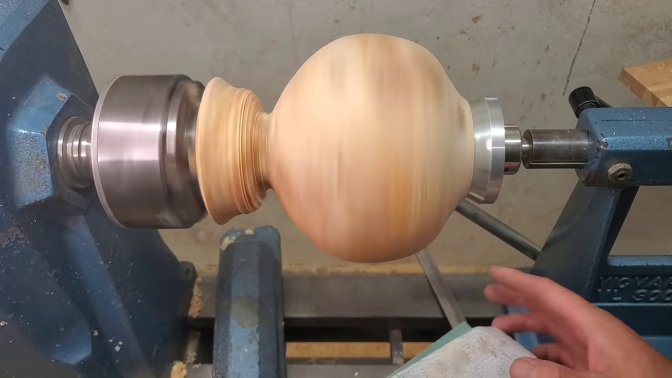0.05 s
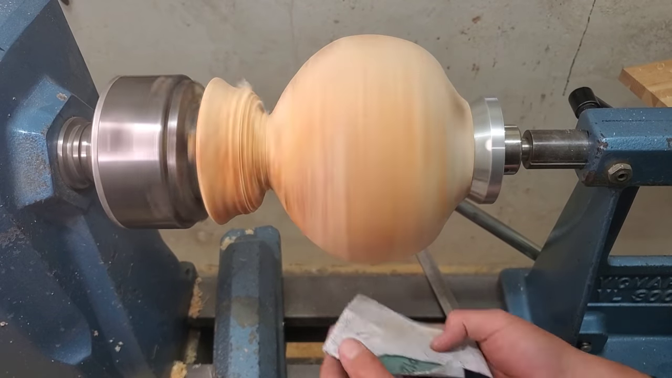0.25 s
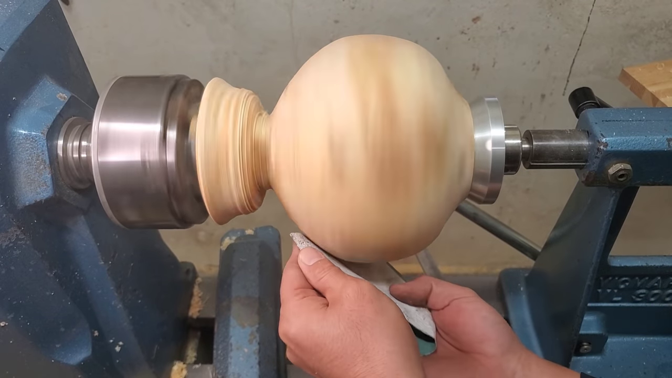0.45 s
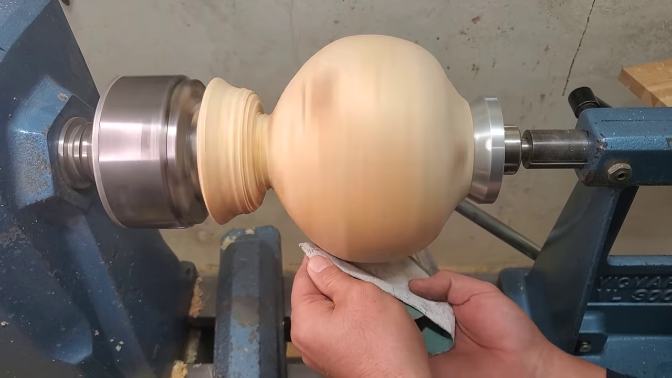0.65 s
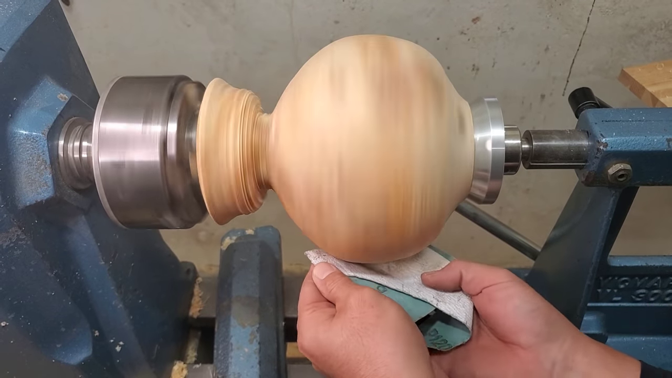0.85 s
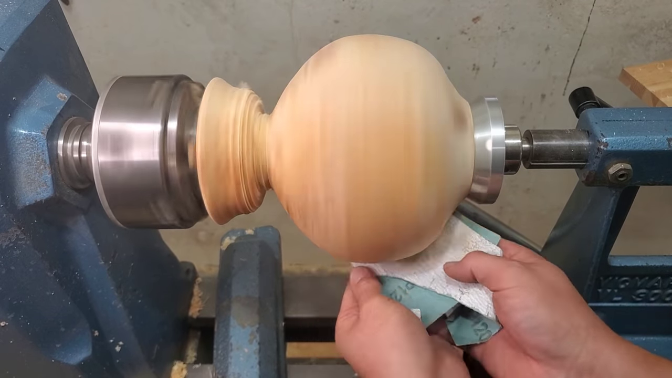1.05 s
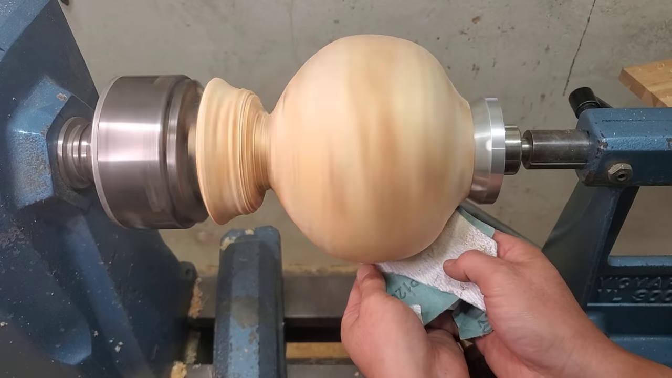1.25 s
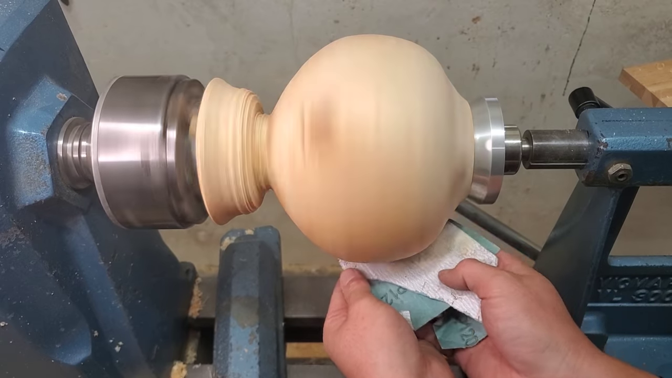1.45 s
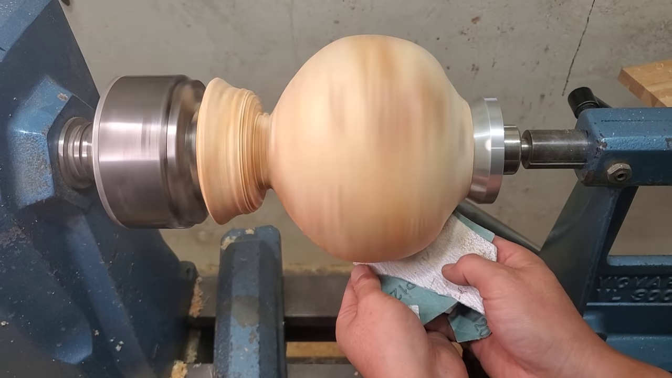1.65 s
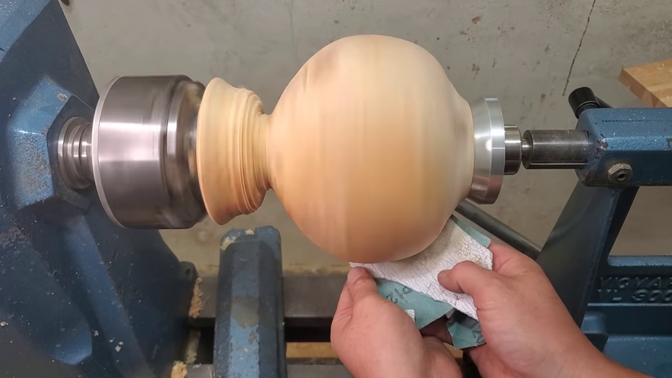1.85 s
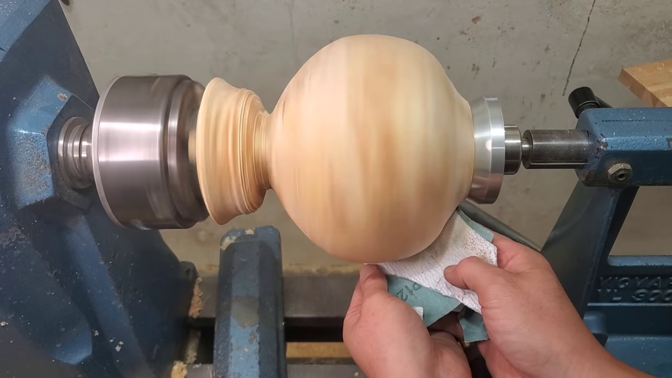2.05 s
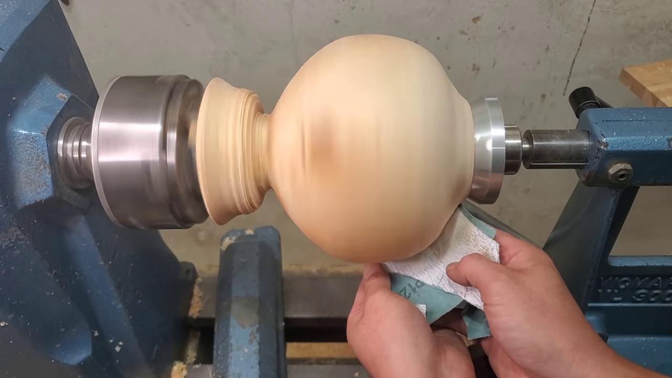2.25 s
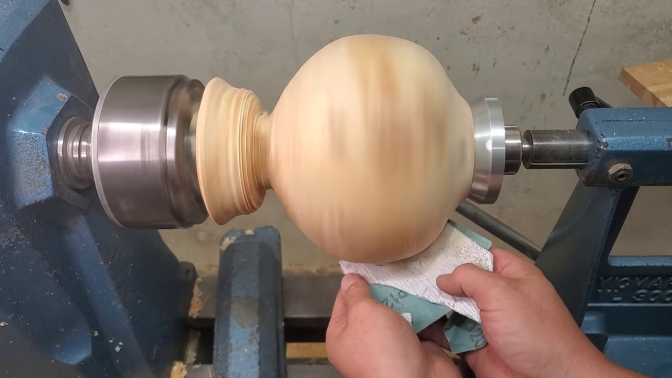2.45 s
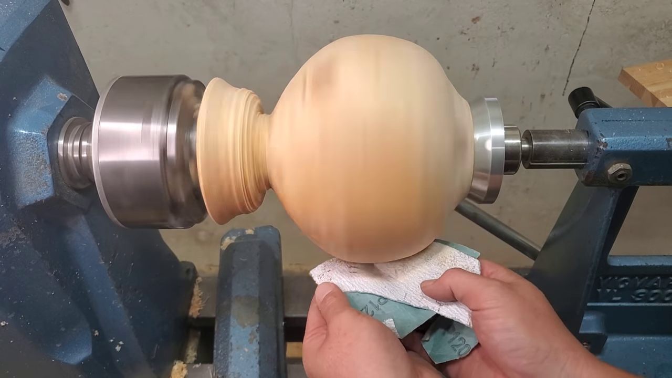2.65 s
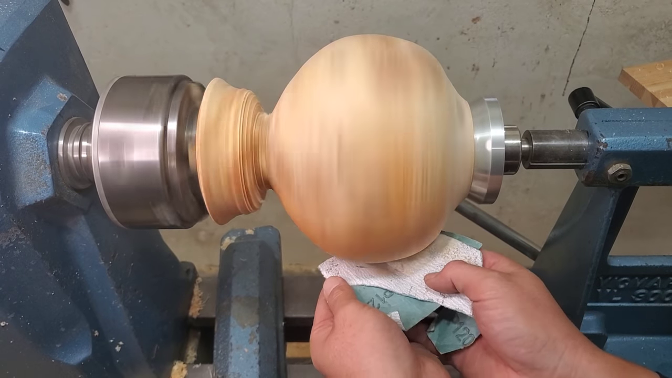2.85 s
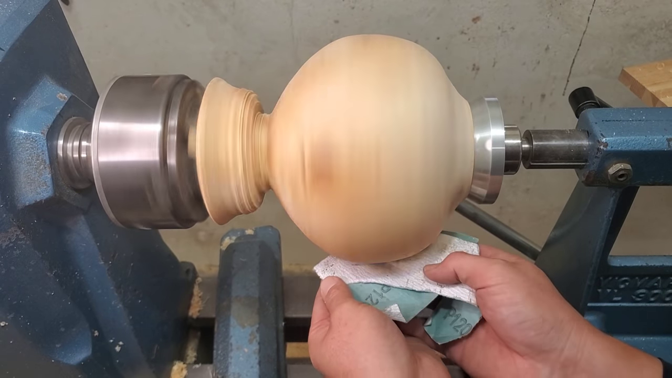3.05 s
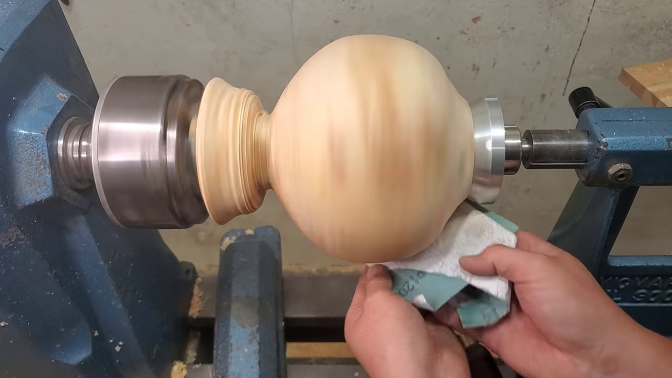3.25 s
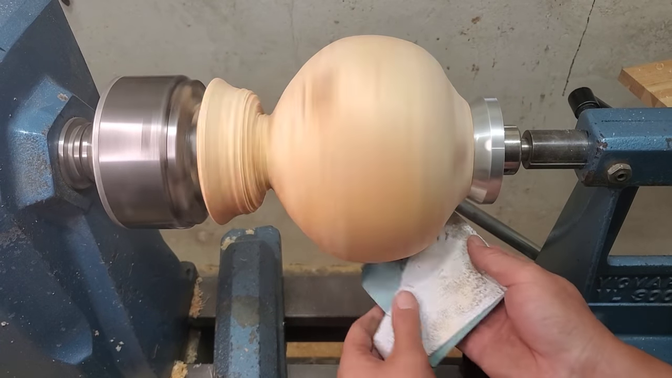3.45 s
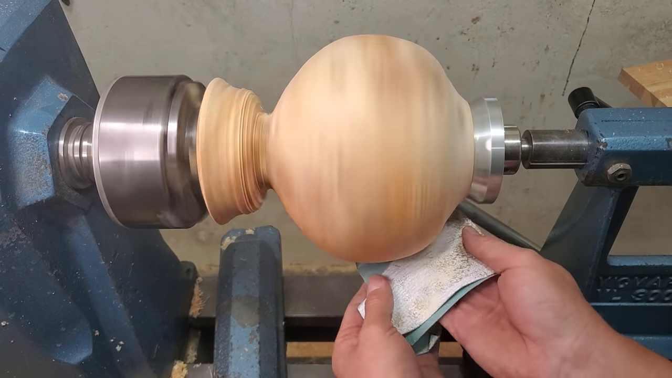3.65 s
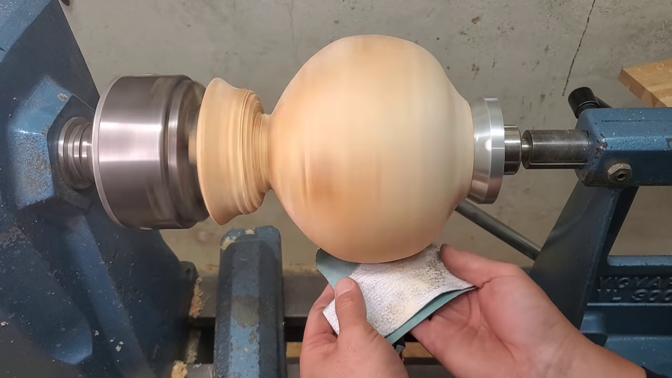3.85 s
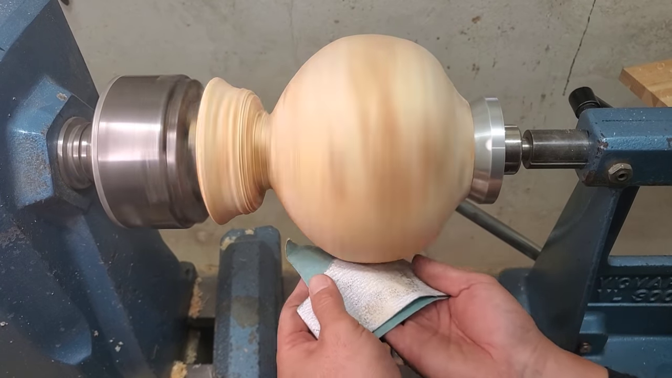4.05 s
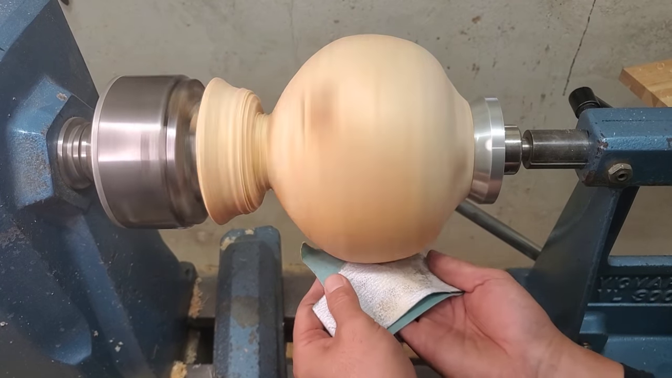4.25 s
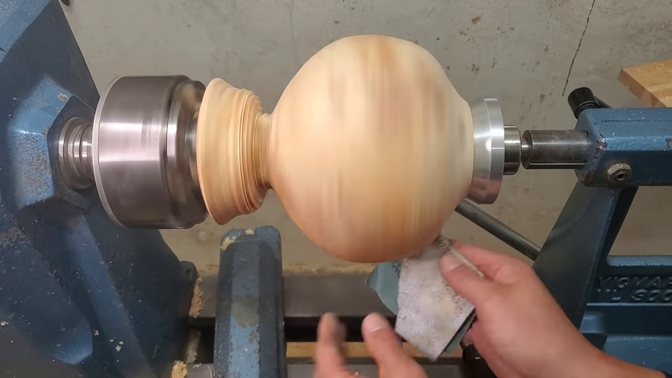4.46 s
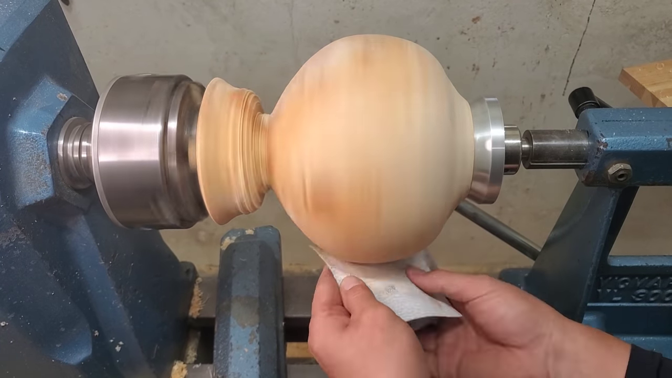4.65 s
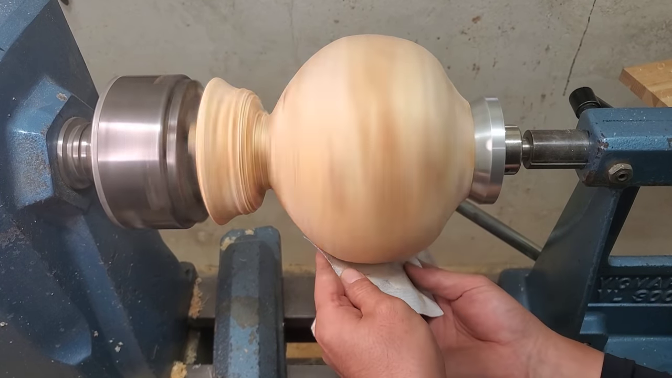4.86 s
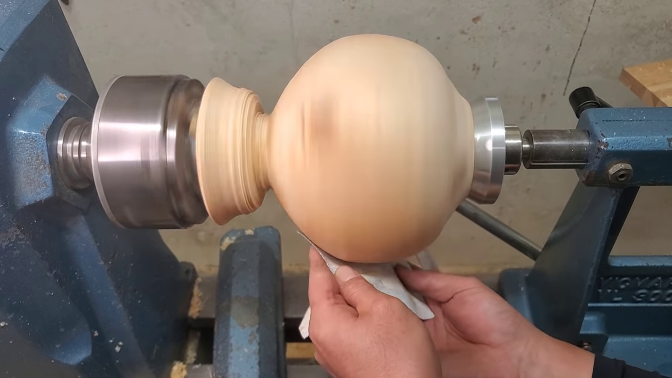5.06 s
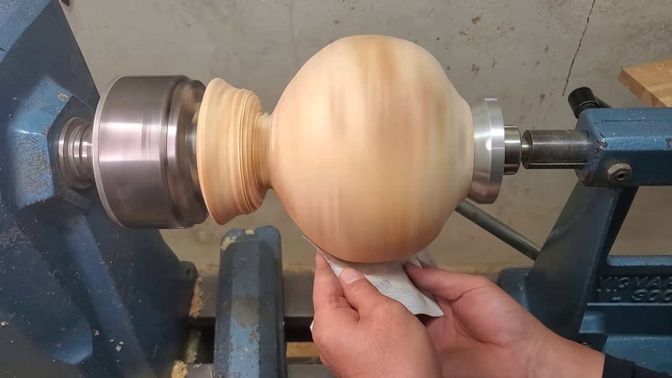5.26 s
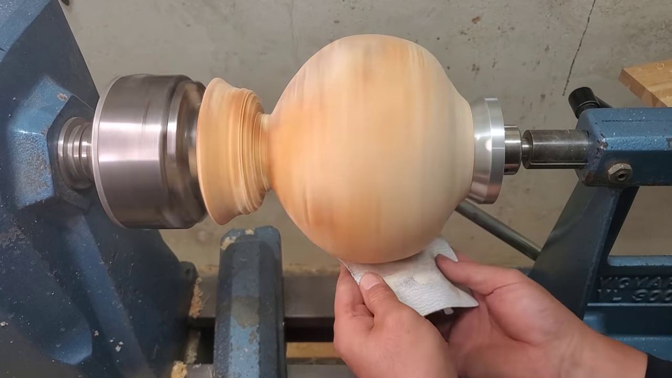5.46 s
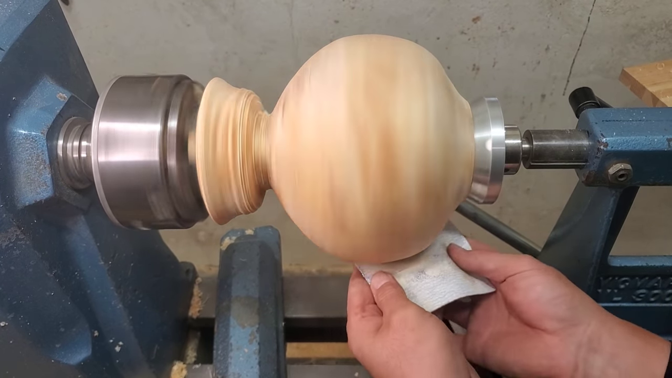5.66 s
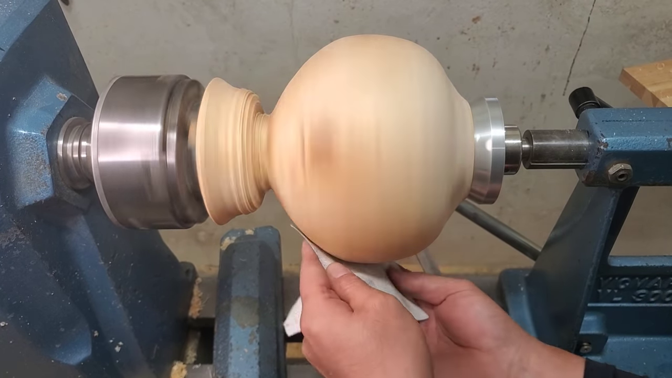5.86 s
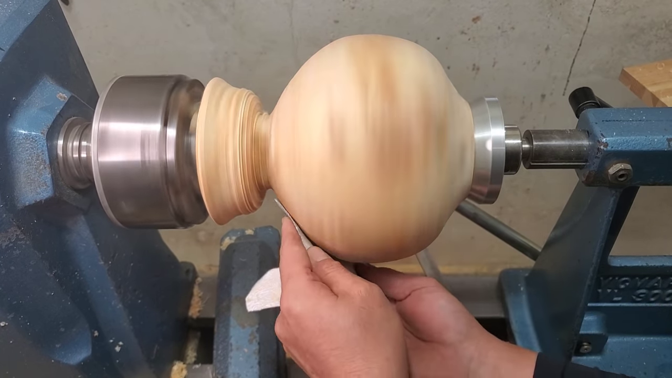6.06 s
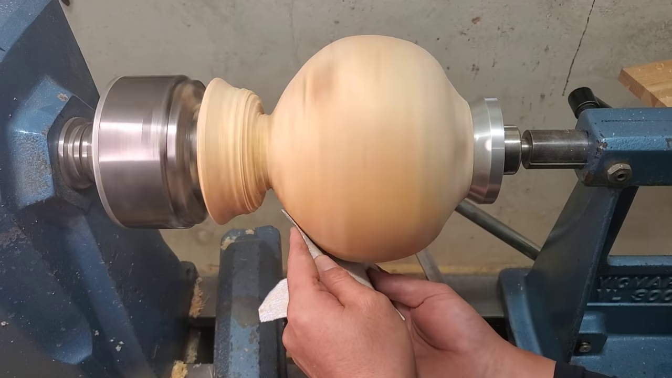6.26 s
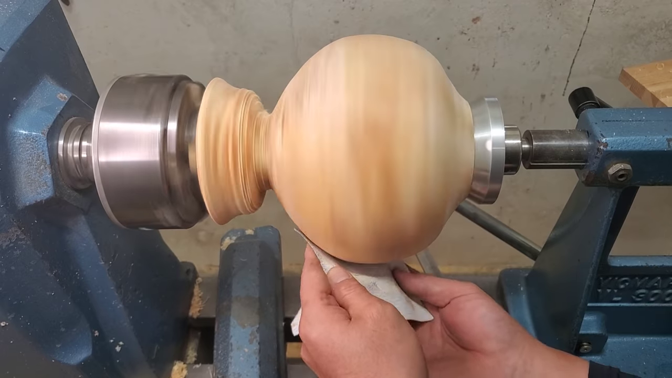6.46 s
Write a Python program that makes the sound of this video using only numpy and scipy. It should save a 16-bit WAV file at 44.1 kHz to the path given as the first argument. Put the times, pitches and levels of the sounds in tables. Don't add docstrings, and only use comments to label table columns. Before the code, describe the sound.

In a workshop, a lathe motor hums low with a faint whine. Paper crackles and soft hand knocks come first, then sandpaper presses on a spinning wooden ball, making a loud, bright, gritty hiss that throbs rapidly with each turn. It drops out briefly twice and continues to the end. Close stereo microphone, short room reverberation.

```python
import sys
import numpy as np
from scipy import signal
from scipy.io import wavfile
from scipy.ndimage import uniform_filter1d

SR = 44100
rng = np.random.default_rng(int(sys.argv[2]) if len(sys.argv) > 2 else 0)


def file_out(sig):
    cols = np.atleast_2d(sig).T
    lim = np.clip(cols, -1, 1)
    pcm = np.round(lim * 32767).astype(np.int16)
    wavfile.write(sys.argv[1], SR, pcm)


def gain_from_decibels(decibels):
    exponent = np.asarray(decibels, float) / 20
    return 10 ** exponent


N = 287091
HOP = 128

# time in seconds, cupping from 0 to 1, bite into the wood in dB,
# wobble once a turn in dB, place of the high spot in turns.
HANDS = [(.55, 0.09, -1.5, 1, .69), (.75, 0.17, 0.5, 1, .45), (.95, .3, -3, 2.5, 0.23),
         (1.33, 0.91, 3.5, 2, 0.36), (1.6, 0.25, 1, 4, 0.22), (1.75, 0.95, 6, 2.5, 0.26),
         (2.3, 0.68, 3.5, 1.5, 0.37), (2.8, .9, 6, 1.2, 0.39), (3.15, 0.56, 2, 3, .24),
         (3.35, .6, 0.5, 0.5, 0.47), (3.8, 0.77, -2, 2.1, 0.75), (4.05, .55, 1, 1.4, 0.36),
         (4.3, 0.35, -3, 3.5, 0.35), (4.87, 0, 4.5, 1.1, -0.14), (5.35, 0.4, 5.5, 0, -.07),
         (5.75, 0.59, -1, 1.8, 0.17), (6.02, 0.39, 6.5, 1, 0.041), (6.45, 0.38, 6.5, -0.5, 0.12)]
# time in seconds, lateness of the left port in microseconds.
PORT_DELAY = [(.7, 12), (1.3, 143), (2.2, 144), (3, 61), (3.65, 147), (4.2, 73), (4.85, 21), (5.75, 104),
              (6.2, 8.2)]
# time in seconds, gain in dB.
GAIN = [(.45, 0), (.52, -6.3), (.87, -6), (1.3, -10.5), (1.81, -8), (3.6, -6.5), (4.35, -7), (5.73, -7),
        (6.04, -9), (6.5, -5)]


def evened(x):
    return x / np.sqrt(np.mean(abs(x) ** 2) + 1e-20)


def read(points, hz):
    f, value = np.transpose(points)
    return np.interp(np.log(hz + 1), np.log(f + 1), value)


def columns(rows, t):
    s, *rest = np.transpose(rows)
    return [np.interp(t, s, c) for c in rest]


def drift(t, rate, count):
    f = np.geomspace(rate / 8, rate, 12)[:, None]
    start = rng.random((count, 12, 1))
    waves = np.sin(2 * np.pi * (f * t + start)) / np.sqrt(f)
    return evened(waves.sum(1))


def sanding():
    # frequency in Hz, level in dB per Hz.
    grit = [(410, -40), (700, -23.5), (1100, -18), (1740, -11.5), (2400, -8.5), (3000, -4.5), (4260, -2.5),
            (5890, -2.5), (8500, -2.5), (12000, -1), (15500, 1)]
    # frequency in Hz, share of the throb.
    throb_share = [(1500, 0.56), (4000, 0.2), (7000, 0.49), (12000, 0.91)]
    # frequency in Hz, left-right likeness.
    likeness = [(800, 0.42), (1500, 0.56), (4500, 0.38), (6500, 0.13), (9000, 0.12), (15000, 0.13)]
    # frequency in Hz, left minus right in dB.
    balance = [(60, 0.5), (180, -1.5), (550, 2.5), (1650, -4), (4970, -4), (15000, -4)]
    # start in seconds, end in seconds,
    # frequency in Hz, width in Hz, level in dB.
    grip_rings = [
        (1.18, 1.46, 5930, 1000, 4),
        (1.7, 2.1, 2040, 200, 4.5),
        (1.9, 2.6, 6040, 800, 2),
        (3.8, 4.1, 9900, 1500, 3),
        (4.85, 5.2, 1410, 150, 2.5),
        (5.1, 5.448, 1980, 150, 8.5),
        (5.95, 6.4, 1990, 150, 2.5),
        (2.398, 3.1, 3870, 500, 1),
    ]
    hz, t, (a, b) = signal.stft(grains(per_s=16000, spread_db=-0.1), SR, nperseg=4 * HOP, noverlap=3 * HOP)
    colour_db = read(grit, hz)[:, None] + grip(hz, t)
    colour_db += np.outer(read(throb_share, hz), throb(t))
    colour_db += rings(grip_rings, hz, t)

    same = np.clip(read(likeness, hz), 0, 1)[:, None]
    late = np.exp(-2j * np.pi * np.outer(hz, columns(PORT_DELAY, t)[0]) * 1e-6)
    pan = gain_from_decibels(read(balance, hz) / 2)[:, None]
    left = (same * b * late + np.sqrt(1 - same ** 2) * a) * pan
    right = b / pan
    ports = np.array([z * reflections(hz, t, depth=0.086, wander=0.054) for z in (left, right)])
    hiss = signal.istft(ports * gain_from_decibels(colour_db), nperseg=4 * HOP, noverlap=3 * HOP)[1][:, :N]
    level_db = uniform_filter1d(contact(np.arange(N) / SR), size=200)
    return evened(hiss) * gain_from_decibels(level_db + 3.0)


def grains(per_s, spread_db):
    hit = rng.random((2, N)) < per_s / SR
    size = gain_from_decibels(spread_db * np.minimum(rng.exponential(1, (2, N)), 5))
    return evened(hit * size * rng.standard_normal((2, N)))


def throb(t):
    # time in seconds, place in turns.
    end_grain = [(2.7, -0.084), (3.9, 0.28), (4.3, 0.36), (5.3, 0.58), (6.4, .23)]
    turns_per_s, end_grain_db = 22.6, 1.35
    s, _, _, wobble_db, high_spot = np.transpose(HANDS)
    arrow = np.interp(t, s, wobble_db * np.exp(-2j * np.pi * high_spot))
    once = 1.32 * (arrow * np.exp(2j * np.pi * turns_per_s * t)).real
    twice = end_grain_db * np.cos(2 * 2 * np.pi * (turns_per_s * t - columns(end_grain, t)[0]))
    tremble = 0.65 * drift(t, rate=54, count=1)[0]
    order = np.arange(3, 8)[:, None]
    knots = np.cos(2 * np.pi * (order * turns_per_s * t + 0.23 * drift(t, rate=1.7, count=5)))
    return once + twice + tremble + 0.78 * knots.sum(0)


def grip(hz, t):
    band_hz = (6600, 2850, 1640)
    flutter_db, cup_db = 1.02, 11.5
    s, cup, bite_db, _, _ = np.transpose(HANDS)
    flutter = flutter_db * drift(t, rate=4, count=1)[0]
    change_db = np.array([flutter, cup_db * np.interp(t, s, cup), np.interp(t, s, bite_db)])
    change_db -= change_db.mean(1, keepdims=True)
    rising_hz = (*band_hz[::-1], 10000)
    weights = [read(list(zip(rising_hz, (*row[::-1], 0))), hz) for row in np.eye(len(band_hz))]
    return np.transpose(weights) @ change_db


def rings(rows, hz, t):
    out = np.zeros((len(hz), len(t)))
    for start, end, f, width, db in rows:
        on = np.clip(np.minimum(t - start, end - t) / .02 + .5, 0, 1)
        out += db * np.outer(np.exp(-(2 * (hz - f) / width) ** 4), on)
    return out


def reflections(hz, t, depth, wander):
    delay = rng.uniform(0.000681, 0.0044, (6, 1)) * (1 + wander * drift(t, rate=1.2, count=6))
    return abs(1 + depth * np.exp(-2j * np.pi * hz[:, None, None] * delay).sum(1))


def contact(t):
    # time in seconds, hiss level in dB.
    pressure = [(.5, -23), (.7, -24), (.88, -21.5), (1.4, -24), (1.536, -28.5), (1.6, -23.5), (2, -24),
                (2.5, -24.5), (3.25, -25), (3.37, -23), (3.8, -24.5), (4.15, -24.5), (4.29, -26),
                (4.45, -24.5), (4.82, -22), (5.43, -25), (6.1, -23.5), (6.5, -26.5)]
    # first graze in seconds, full touch in seconds, rise in seconds,
    # easing off in seconds, lift in seconds.
    strokes = [
        (.428, .443, .024, 3.395, 3.428),
        (3.57, 3.602, .014, 4.526, 4.562),
        (4.569, 4.577, .008, 4.5, 4.614),
        (4.756, 4.768, .045, 7, 7.1),
    ]
    # start in seconds, level in dB,
    # fade in dB per second.
    rustle_rows = [
        (0, -54, -10),
        (.082, -42, -190),
        (.16, -56, 0),
        (.252, -49, -20),
    ]
    away_db = -90
    graze_db, graze_s, ease_db, ease_s = -17, .008, -6, .016
    lift_db, lift_s, flap_db_per_s = -22, .024, -140
    off_db = lift_db - ease_db
    levels = [2 * graze_db, graze_db, graze_db, 0, 0, off_db, off_db + flap_db_per_s]
    shapes = []
    for graze, touch, rise, ease, lift in strokes:
        times = [graze, graze + graze_s, touch, touch + rise, lift, lift + lift_s, lift + 1]
        easing = ease_db * np.clip((t - ease) / ease_s, 0, 1)
        shapes.append(np.interp(t, times, levels, left=away_db) + easing)
    until = [row[0] for row in rustle_rows[1:]] + [strokes[0][1]]
    rustles = []
    for (s, db, fade), end in zip(rustle_rows, until):
        rustles.append(np.where((t >= s) & (t < end), db + fade * (t - s), away_db))
    return np.max([columns(pressure, t)[0] + np.max(shapes, 0), *rustles], 0)


def dropouts(x):
    # start in seconds, end in seconds, frequency in Hz,
    # width in Hz.
    nulls = [(1.09, 1.16, 5000, 280), (1.3, 1.42, 4350, 180), (1.52, 1.64, 4430, 260),
             (1.44, 1.55, 3700, 260), (1.8, 1.86, 4150, 220), (1.91, 2.0, 5250, 280),
             (1.99, 2.1, 4250, 200), (2.06, 2.27, 3650, 280), (2.27, 2.38, 3450, 220),
             (2.42, 2.5, 3600, 260), (2.6, 2.67, 5000, 320), (3.19, 3.32, 5400, 340),
             (3.13, 3.34, 3600, 250), (3.63, 3.77, 3700, 300), (3.63, 3.76, 5100, 180),
             (3.81, 4.01, 4900, 230), (3.89, 4.01, 3380, 280), (4.03, 4.08, 3650, 220),
             (4.19, 4.24, 3650, 220), (4.39, 4.53, 3520, 170), (4.855, 4.92, 3450, 560),
             (4.955, 5.02, 3500, 380), (5.41, 5.46, 3600, 240), (5.56, 5.69, 3550, 360),
             (5.76, 5.85, 3500, 260), (5.58, 5.74, 5450, 340), (5.8, 5.94, 5400, 320)]
    hz, t, (left, right) = signal.stft(x, SR, nperseg=1024, noverlap=768)
    depth_db = rings([(*row, -19) for row in nulls], hz, t) + thin_nulls(hz, t)
    both = (left + right) / 2 * gain_from_decibels(depth_db)
    apart = (left - right) / 2
    return signal.istft(np.array([both + apart, both - apart]), nperseg=1024, noverlap=768)[1][:, :N]


def thin_nulls(hz, t):
    depth_db, rarity = -15, .95
    centre_hz, width_hz = 4300, 3200
    noise = rng.standard_normal((len(t), len(hz))).T
    streaks = evened(uniform_filter1d(uniform_filter1d(noise, size=2, axis=0), size=16, axis=1))
    late = columns(PORT_DELAY, t)[0]
    band = np.exp(-(2 * (hz - centre_hz) / width_hz) ** 4)
    likely = np.outer(band, (abs(late) / late.max()) ** .25)
    return depth_db * np.clip(2 * (streaks - rarity - 2 * (1 - likely)), 0, 1)


def knocks():
    # start in seconds, level in dB, pitch in Hz, t60 in seconds.
    blows = [
        (.083, -44, 9000, .08),
        (0.062, -55, 35, .3),
        (0.254, -43, 6500, 0.085),
        (.26, -39.5, 200, .5),
        (.36, -40.5, 217, 0.5),
        (0.421, -41, 45, .4),
        (1.228, -39, 590, 0.25),
        (1.243, -37.5, 250, 0.067),
        (1.258, -40, 1110, 0.072),
    ]
    out, t = np.zeros((2, N)), np.arange(16000) / SR
    for s, db, hz, t60 in blows:
        band = signal.butter(1, [hz / 1.1, hz * 1.15], "band", fs=SR)
        puff = signal.lfilter(*band, rng.standard_normal((2, len(t))))
        puff = evened(puff + 0.44 * puff[::-1]) * np.minimum(t / 0.0036, 1)
        out[:, round(s * SR):][:, :len(t)] += gain_from_decibels(db - 60 * t / t60) * puff
    return out


def whine():
    # time in seconds, whine in dB.
    load = [(0, -34), (.2, 2), (.6, -3), (.76, 2), (1.07, -3), (1.2, -10), (1.4, -0.5), (1.81, 0.5),
            (2.74, -2), (2.92, 0), (4.41, -3.5), (4.57, 0.5), (5.26, -5), (5.69, 1)]
    whine_hz, whine_db, low_order_db = 389, -44.5, -5.5
    t = np.arange(0, N / SR + .01, .002)
    flutter, swell, low_swell = drift(t, rate=45, count=3)
    at = np.arange(N) / SR
    turns = np.cumsum(whine_hz * (1 + 0.011 * np.interp(at, t, flutter))) / SR
    high = gain_from_decibels(1.1 * np.interp(at, t, swell)) * np.sin(2 * np.pi * turns)
    low = gain_from_decibels(low_order_db + 2.5 * np.interp(at, t, low_swell)) * np.sin(2 * np.pi * turns / 3)
    level_db = whine_db + columns(GAIN, at)[0] + columns(load, at)[0]
    return np.sqrt(2) * (high + low) * gain_from_decibels(level_db + [[-2.2], [.2]])


def machine():
    # frequency in Hz, level in dB per Hz.
    rumble = [(25, -25), (60, -25), (95, -17), (200, -12.5), (330, -15.5), (500, -17.5), (1000, -14.5),
              (2000, -18.5), (4000, -25.5), (8000, -35), (15600, -42)]
    # resonance in Hz, width in Hz, level in dB.
    frame = [(127.5, 14.3, -3.5), (166.4, 12.4, -1), (237, 24, -7), (56.6, 14, -19), (553, 15, -11),
             (15000, 200, -28)]
    # frequency in Hz, left-right likeness.
    likeness = [(60, 0.83), (150, 1), (380, 0.68), (950, -0.012), (2380, -0.031), (5980, -0.25),
                (15000, 0.15)]
    frames, hz = N // 1024 + 5, np.fft.rfftfreq(4096, 1 / SR)
    a, b, c, d = rng.standard_normal((frames, len(hz), 4)).T
    power = gain_from_decibels(read(rumble, hz)) ** 2
    power += sum(gain_from_decibels(db) ** 2 / (1 + (2 * (hz - f) / width) ** 2) ** 2 for f, width, db in frame)
    left = a + 1j * b
    orders = (hz < 450)[:, None]
    left *= (1 - 0.59 * orders) + 0.95 * orders / abs(left)
    same = np.clip(read(likeness, hz), -1, 1)[:, None]
    right = same * left + np.sqrt(1 - same ** 2) * (c + 1j * d)
    z = np.array([left, right]) * np.sqrt(power)[:, None]
    hum = signal.istft(z * gain_from_decibels([[[-.8]], [[.8]]]), nperseg=4096, noverlap=3072)[1][:, :N]
    return evened(hum) * gain_from_decibels(-39.5 + columns(GAIN, np.arange(N) / SR)[0] + 2.5)


def shop(x):
    # frequency in Hz, t60 in seconds.
    decay = [(500, 0.44), (2000, 0.34), (5000, 0.19), (10000, 0.11), (15500, 0.056)]
    hz, t, z = signal.stft(rng.standard_normal((2, SR // 2)), SR, nperseg=256)
    tail = signal.istft(z * gain_from_decibels(-60 * t / read(decay, hz)[:, None]), SR, nperseg=256)[1]
    return signal.fftconvolve(x, tail / np.linalg.norm(tail[0]), axes=1)[:, :N]


def scene():
    hiss = sanding()
    shop_db = -10.5
    airborne = hiss + gain_from_decibels(shop_db) * shop(hiss) + machine()
    return dropouts(airborne) + whine() + knocks()


def band_limit(x):
    return signal.sosfilt(signal.butter(12, 15500, fs=SR, output="sos"), x)


def record(dry):
    mix = signal.oaconvolve(dry, signal.firwin(255, 15900, fs=SR)[None], "same")
    return band_limit(mix)


dry = scene()
out = record(dry)
file_out(out)
```